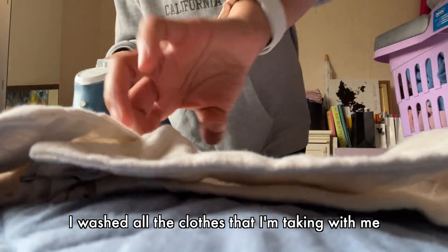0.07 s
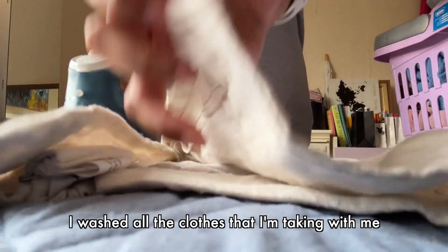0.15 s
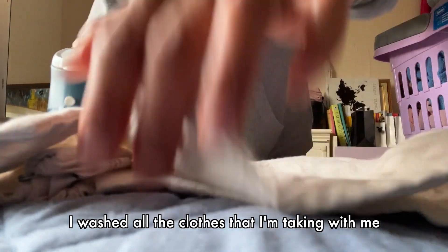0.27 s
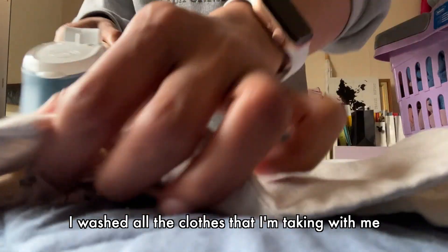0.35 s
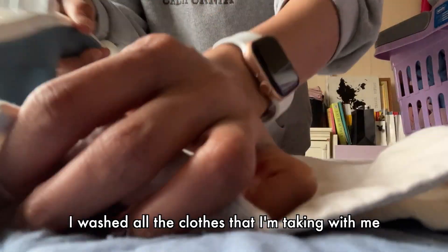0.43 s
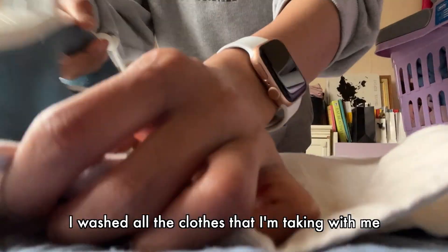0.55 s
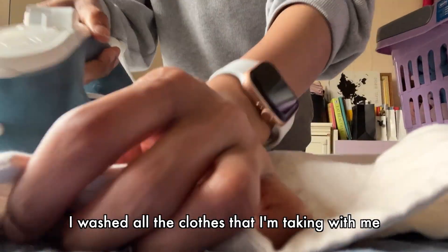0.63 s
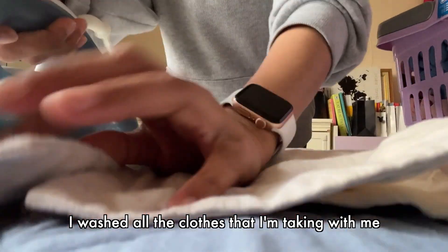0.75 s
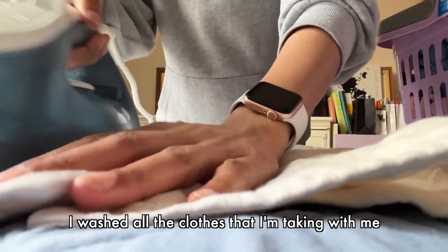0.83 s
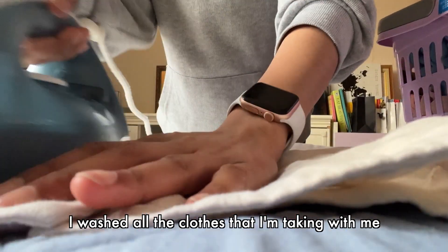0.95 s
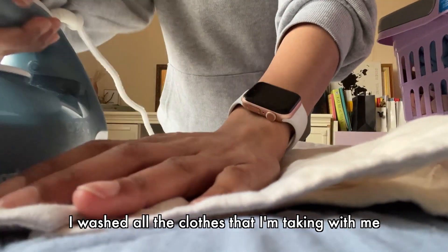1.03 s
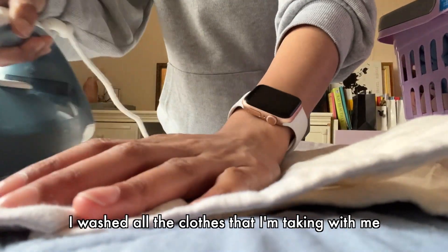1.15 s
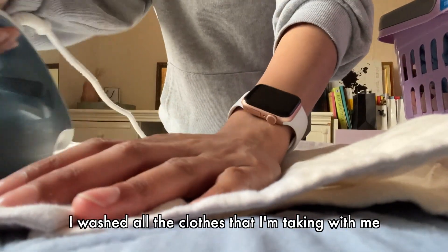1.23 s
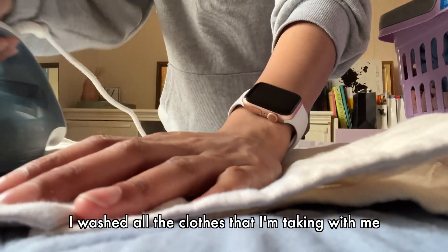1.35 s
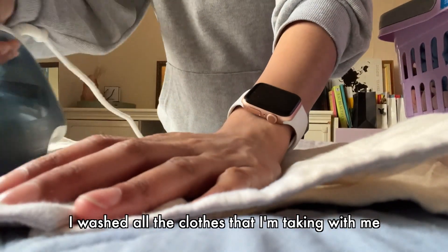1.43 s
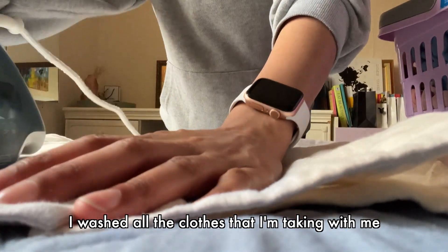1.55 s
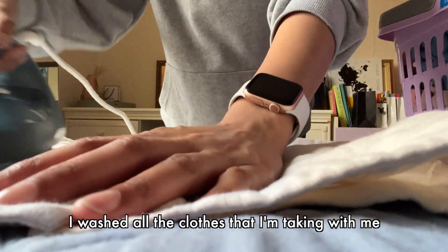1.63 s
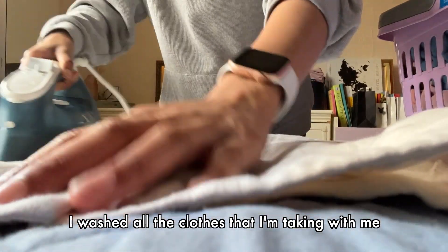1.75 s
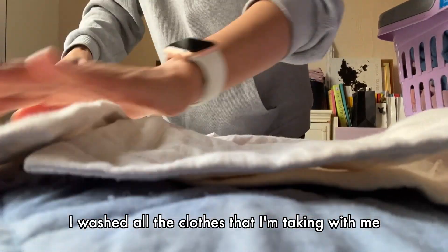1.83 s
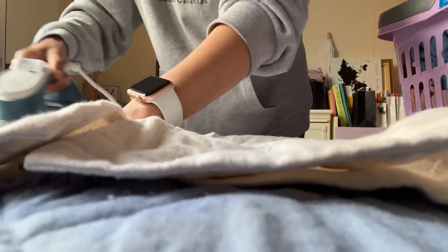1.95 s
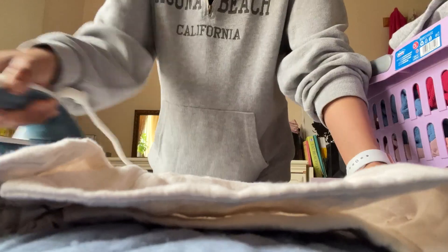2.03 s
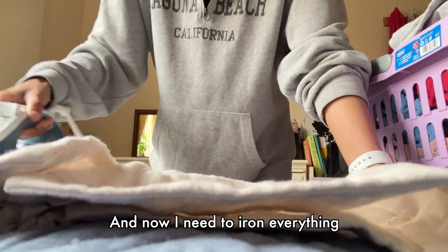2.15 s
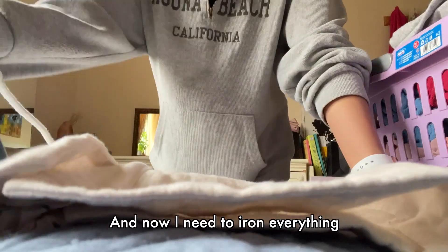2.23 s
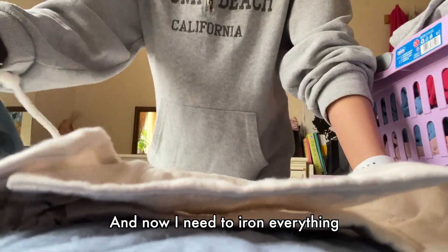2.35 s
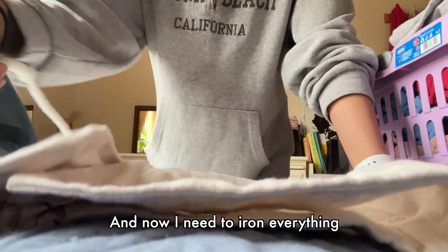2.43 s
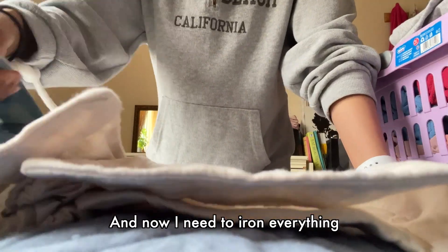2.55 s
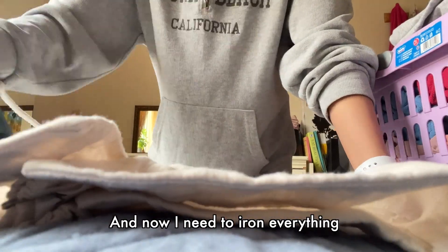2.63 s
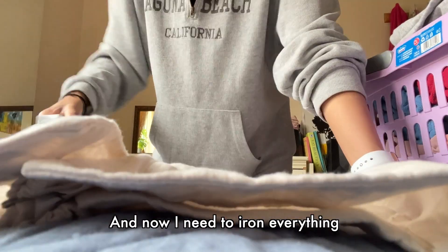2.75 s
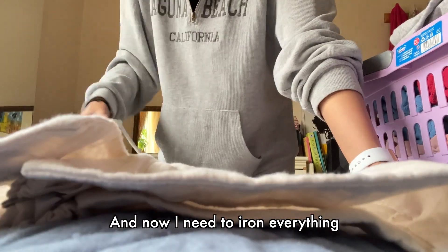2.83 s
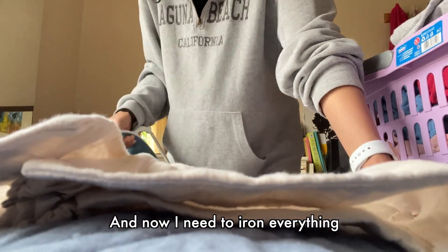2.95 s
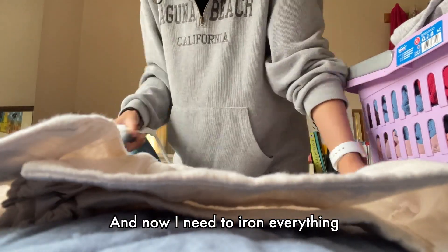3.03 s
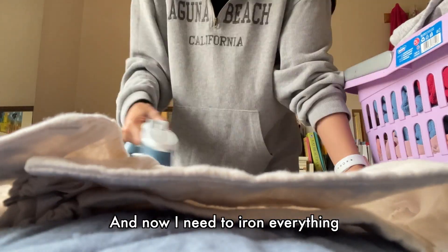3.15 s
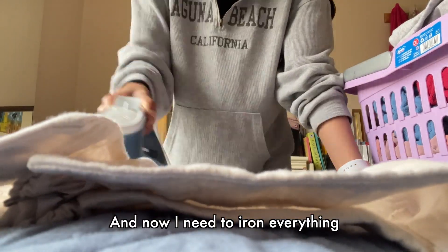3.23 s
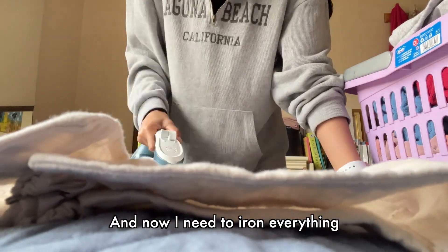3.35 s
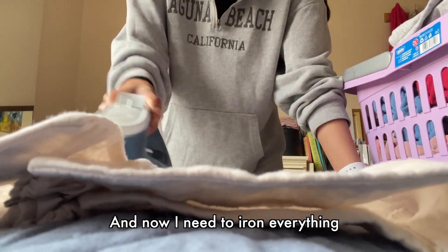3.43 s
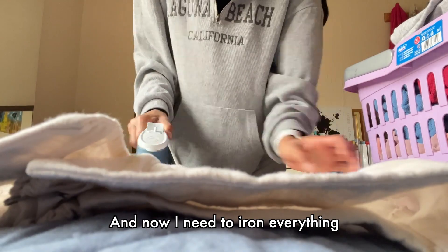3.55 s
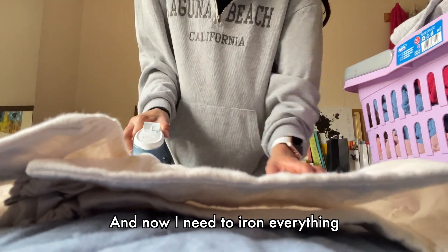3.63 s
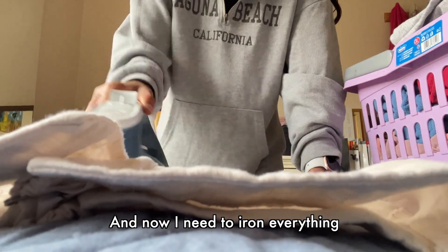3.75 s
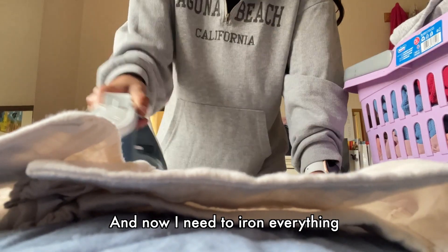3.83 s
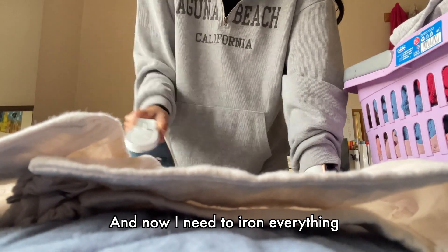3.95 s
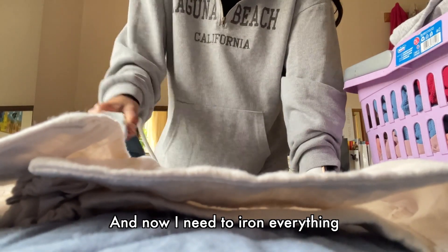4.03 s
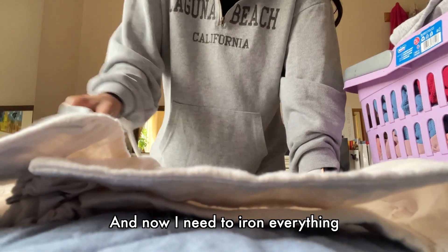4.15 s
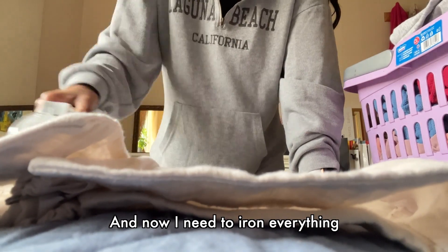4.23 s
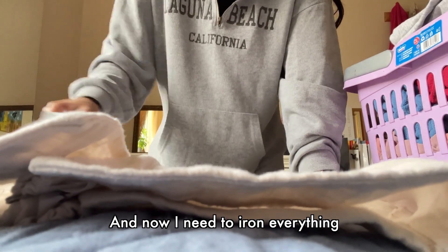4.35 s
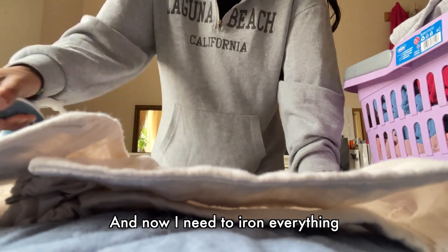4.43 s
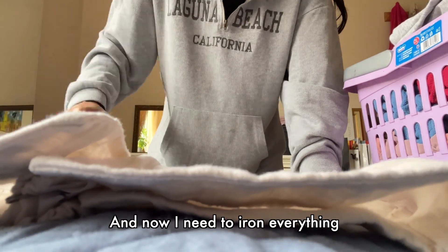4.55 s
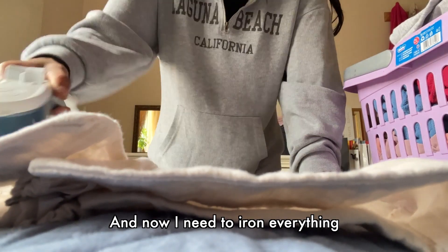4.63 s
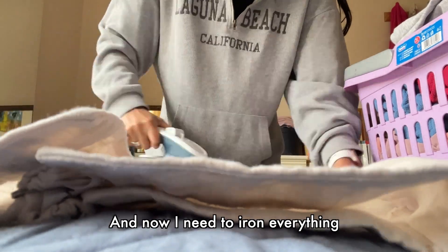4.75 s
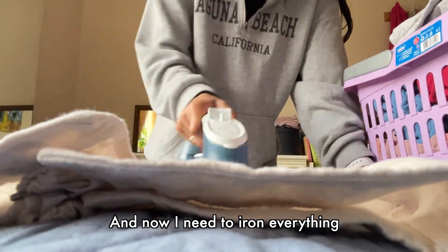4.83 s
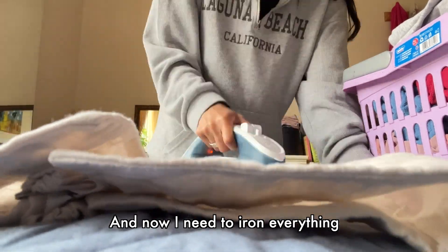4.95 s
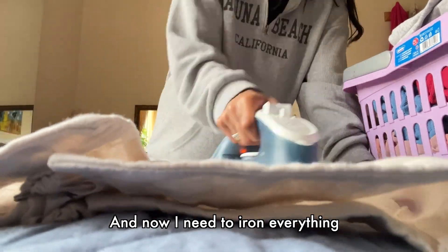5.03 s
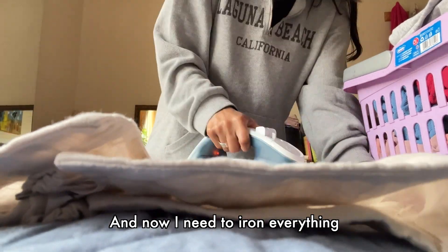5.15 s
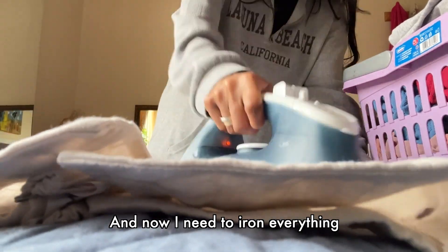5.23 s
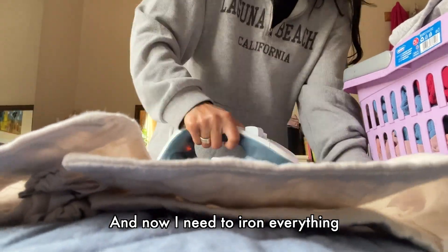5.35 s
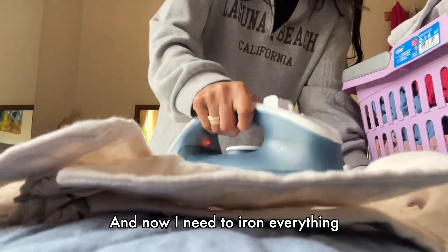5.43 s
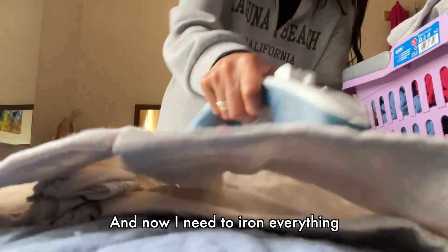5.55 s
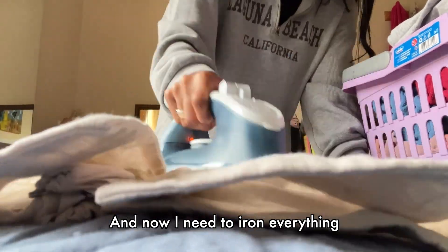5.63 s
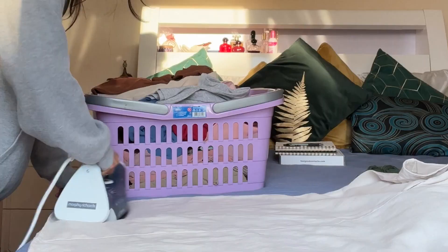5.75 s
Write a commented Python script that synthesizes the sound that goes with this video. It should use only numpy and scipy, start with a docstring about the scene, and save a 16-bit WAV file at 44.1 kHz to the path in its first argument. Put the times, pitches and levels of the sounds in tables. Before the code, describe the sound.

Close, sped-up ironing on a bed: plastic knocks, a big padded thump, rustling fabric, then short soft swishes with a few small bumps and ticks.

```python
"""On a bed, clothes are ironed, sounding sped up as in a time-lapse, close to a stereo microphone.
Hands slide over the cloth, which rubs and hisses: shaped noise with many tiny slips in it.
The soleplate swishes to and fro, with bands of noise that follow its speed. Hand and iron land with thumps,
damped low swings, two of them heavy. Folds crunch and creases snap as short bursts of noise.
The iron's body knocks, its plastic shell clatters and small hard parts clink, all as brief resonances."""
import sys
import numpy as np
from scipy import signal
from scipy.fft import rfft, irfft, next_fast_len
from scipy.io import wavfile

SR = 44100
rng = np.random.default_rng(int(sys.argv[2]) if len(sys.argv) > 2 else 0)


def master(y):
    """Save y as 16-bit WAV."""
    cut = np.clip(np.atleast_2d(y).T, -1, 1)
    pcm = np.round(cut * 32767)  # scale
    wavfile.write(sys.argv[1], SR, pcm.astype(np.int16))


N = 255118
TIME = np.arange(N) / SR
SIZE = next_fast_len(N, True)   # padded length for the Fourier transforms
BIN_HZ = np.maximum(np.arange(SIZE // 2 + 1) * SR / SIZE, 1)


# tone colour of rubbing cloth: (f/Hz, relative level/dB)
RUB_COLOUR = [(170, -10.5), (270, 0.5), (360, -6), (480, -6), (700, -14), (1000, -17.5), (1500, -26.5),
              (2500, -30.5)]
# tone colour of hissing fibres: (f/Hz, relative level/dB)
HISS_COLOUR = [(900, -5.5), (1900, 3), (2700, -0.5), (3400, 1.5), (4150, 5.5), (5200, 0.5), (6500, 1),
               (8500, 2), (10500, -21.5), (12500, -14.5), (14000, -5), (15500, -27)]
DRAG_FOLLOWS = 0.63   # share of a stroke's swing in level that the dragged cloth follows


def cloth(stir_rub_db=-10, stir_hiss_db=-19, drag_rub_db=-24, drag_hiss_db=-28):
    """Cloth slid by hand, dragged by the iron or just stirring rubs in the middle range and hisses on top."""
    stir = stirring()
    drag = stroke_force() ** DRAG_FOLLOWS
    slide_rub, slide_hiss = slides()
    sliding, shaking = stills()
    rub = sliding * together(slide_rub, from_db(stir_rub_db) * stir * shaking, from_db(drag_rub_db) * drag)
    hiss = sliding * together(slide_hiss, from_db(stir_hiss_db) * stir, from_db(drag_hiss_db) * drag)
    out = bedding_rumble(stir, shaking, slide_rub, hiss)
    out += rub * friction(RUB_COLOUR, slips_per_s=220, slip_db=-5, catch_db=2.0, catch_rate=48)
    out += hiss * friction(HISS_COLOUR, slips_per_s=1400, slip_db=-10.5, catch_db=1.2, catch_rate=35)
    return out


# a hand or a sleeve slides over the cloth: (t/s at full speed, length/s, rubbing level/dB, hiss level/dB)
SLIDES = [(0.119, 0.085, -32.5, -45.5), (0.175, 0.044, -43, -38), (0.288, 0.031, -45, -46.5),
          (0.326, 0.064, -58, -43), (0.396, 0.032, -35.5, -44.5), (0.462, 0.077, -29.5, -40),
          (0.552, 0.056, -33, -34), (0.625, 0.11, -29, -38), (0.692, 0.057, -34, -35),
          (0.796, 0.13, -40.5, -42.5), (0.93, 0.065, -39.5, -38.5), (1.067, 0.067, -35.5, -47),
          (1.138, 0.045, -36.5, -54), (1.203, 0.06, -39.5, -38.5), (1.332, 0.097, -41.5, -46.5),
          (1.476, 0.083, -44.5, -41.5), (1.591, .13, -39, -48), (1.793, 0.13, -45, -48.5),
          (1.916, 0.14, -41.5, -55), (2.041, 0.13, -43.5, -46.5), (2.191, 0.049, -38, -50.5),
          (2.243, 0.044, -35, -40), (2.321, 0.042, -34.5, -44), (2.374, 0.047, -40, -45),
          (2.46, 0.091, -43.5, -42.5), (2.579, 0.056, -49, -43), (2.693, 0.089, -36, -48),
          (2.844, 0.041, -40.5, -52), (2.935, 0.079, -41, -50.5), (3.08, 0.28, -45.5, -56),
          (3.248, 0.15, -47.5, -51), (3.417, 0.11, -46, -47.5), (3.823, 0.22, -44.5, -51),
          (3.992, 0.13, -68, -53), (4.198, 0.079, -58, -49.5), (4.421, 0.082, -40.5, -51),
          (4.585, 0.14, -42.5, -72), (4.678, 0.2, -39, -47), (4.873, 0.099, -40, -46),
          (5.09, 0.12, -61, -50.5), (5.258, 0.12, -42, -47), (5.412, 0.064, -33.5, -47.5),
          (5.506, 0.085, -37, -43.5), (5.587, 0.022, -45, -47), (5.732, 0.2, -43, -44)]
SLIDE_FLATNESS, SLIDE_END_DB = 1.69, -6   # how long a slide holds its speed; its change at either end
WEIGHT_LEAD_S = 0.0017   # the weight peaks this much before the speed


def slides():
    """A slide gathers speed, holds it and eases off, its weight a little early: the gains of rubbing and hiss."""
    power = np.zeros((2, N))
    for s, length, rub_db, hiss_db in SLIDES:
        near = np.abs(TIME - s) < length
        from_middle = np.abs(TIME[near] - s + np.array([[WEIGHT_LEAD_S], [0]])) / (length / 2)
        level_db = np.array([[rub_db], [hiss_db]]) + SLIDE_END_DB * from_middle ** SLIDE_FLATNESS
        power[:, near] += from_db(level_db) ** 2
    return np.sqrt(power)


# the movement stops or turns round: (t/s, length/s, change of friction level/dB, change of rumble level/dB)
STILLS = [(0.02, 0.05, -7.5, 0.5), (0.312, 0.025, -5.5, -6.5), (0.869, 0.014, -9, -1),
          (1.002, 0.085, 0.5, -14.5), (1.283, 0.069, -1, -9), (1.405, 0.044, -6.5, 1.5),
          (1.529, 0.042, -2.5, -6.5), (1.747, 0.082, 0.5, -6.5), (1.839, 0.073, -12, 5),
          (2.97, 0.023, -13, 6), (3.097, 0.029, -6.5, 7), (3.29, .03, -2, 5), (3.391, 0.027, -3.5, 3),
          (3.49, .025, -2.5, 3.5), (3.625, 0.071, -4.5, -9), (3.698, 0.025, -8, -7),
          (3.942, 0.022, -0.5, -21), (4.033, 0.01, -5, 1), (4.118, 0.015, -8, -5),
          (4.225, 0.023, -4.5, 5.5), (4.332, 0.018, -7, 3), (4.446, .02, -4.5, -1),
          (4.538, 0.075, -1.5, -5), (5.002, 0.021, -3.5, 9.5)]


def stills():
    """Friction mostly dies down where the movement stops or turns round: the gains of friction and rumble."""
    change_db = np.zeros((2, N))
    for s, length, friction_db, rumble_db in STILLS:
        near = np.abs(TIME - s) < length
        dip = np.exp(-np.abs(2 * (TIME[near] - s) / length) ** 3)
        change_db[:, near] += np.array([[friction_db], [rumble_db]]) * dip
    return from_db(change_db)


def folds(x, depth_db=7.5, rate=18, count=8):
    """Shifting folds favour now one pitch, now another."""
    out = x
    for hz in np.geomspace(450, 6000, count):
        favour = from_db(depth_db * np.tanh(drift(rate)))
        out = out + resonate(x, hz, hz / 4) * (favour - 1)
    return out


# tone colour of the swish: (f/Hz, relative level/dB)
SWISH_COLOUR = [(200, -34), (380, 2), (800, -3), (1400, -6.5), (2000, -9), (3000, -19.5), (5000, -58),
                (9000, -69)]
# tone colour of the grit in firm strokes: (f/Hz, relative level/dB)
GRIT_COLOUR = [(1500, -32), (2400, 24), (3600, 18.5), (6000, -47), (10000, -42)]
# soleplate strokes: (t/s at the height, level/dB, swell/s, fade/s, weave pitch at full speed f/Hz)
STROKES = [(1.655, -45, 0.061, 0.1, 1170), (2.029, -50, 0.11, 0.062, 1403),
           (2.125, -37, 0.024, 0.029, 1400), (2.245, -66, 0.018, 0.025, 1300),
           (2.729, -43.5, 0.019, 0.02, 1100), (2.762, -38, 0.013, 0.013, 920),
           (3.235, -49.5, 0.023, 0.04, 1300), (3.334, -41.5, 0.031, 0.029, 1340),
           (3.44, -46.5, 0.039, 0.028, 1405), (3.552, -41.5, 0.051, .028, 1196),
           (3.794, -50.5, 0.035, .025, 1426), (3.874, -38, 0.028, 0.032, 1463),
           (3.999, -46, 0.044, 0.028, 1554), (4.067, -38, 0.021, .026, 1480),
           (4.179, -42, 0.046, .036, 1495), (4.283, -39, 0.039, .022, 1570),
           (4.385, -42, 0.037, .042, 1324), (4.498, -40, 0.031, 0.024, 1338),
           (4.712, -42, 0.05, 0.06, 1298), (4.878, -41.5, 0.074, 0.035, 1233),
           (4.959, -34, .024, .02, 1260), (5.068, -48, 0.058, .03, 926), (5.129, -39.5, 0.02, .02, 1545),
           (5.153, -33, .013, 0.018, 1150), (5.316, -36.5, 0.022, .025, 1384),
           (5.338, -28.5, .009, 0.016, 1070), (5.411, -49.5, 0.03, 0.038, 998),
           (5.51, -50, 0.023, 0.017, 1000), (5.61, -33, 0.009, 0.02, 905),
           (5.664, -44.5, 0.013, 0.024, 1000)]
# thread spacings that sing under the plate: (multiple of the weave pitch, width f/Hz, level/dB)
WEAVE = [(.7, 230, -10.5), (1, 152, -5), (1.32, 260, -9)]
STROKE_ROUNDNESS = 1.75   # how evenly a stroke eases off: 1 is a sudden drop with a tail, 2 a round shoulder
SLOW_PITCH = .48   # share of the weave pitch left when the plate is slow
SPEED_SPAN, SPEED_LAG = .7, .15   # width and delay of the speed's arch, in stroke lengths (swell + fade)


def soleplate(swish_db=0.0, grit_db=-6, firm_db=-33, bed_db=-4, dent_db=0, dent_hz=240, dent_width_hz=150):
    """The plate swishes over the weave, its pitch following the speed; firm strokes add grit, rub and drone."""
    force = stroke_force()
    bite = np.tanh(force / from_db(firm_db)) ** 2   # near 1 for firm strokes, near 0 for light ones
    swish = friction(SWISH_COLOUR, slips_per_s=1200, slip_db=-8, catch_db=1.6, catch_rate=90)
    grit = friction(GRIT_COLOUR, slips_per_s=2500, slip_db=-6, catch_db=1, catch_rate=120)
    bed_rub = friction(RUB_COLOUR, slips_per_s=250, slip_db=-8, catch_db=1, catch_rate=36)
    bed_drone = ringing_band(np.full(N, dent_hz), dent_width_hz)
    out = from_db(swish_db) * force * swish
    out += from_db(grit_db) * force * bite * grit
    out += from_db(bed_db) * force * bite * bed_rub
    out += from_db(dent_db) * force * np.sqrt(bite) * bed_drone
    for s, level_db, swell, fade, top_hz in STROKES:
        near, gain = contact(s, level_db, swell, fade, STROKE_ROUNDNESS)
        speed = np.exp(-(((TIME[near] - s) / (swell + fade) - SPEED_LAG) / SPEED_SPAN) ** 2)
        hz = top_hz * (SLOW_PITCH + (1 - SLOW_PITCH) * speed)
        for multiple, width, thread_db in WEAVE:
            out[:, near] += from_db(thread_db) * gain * ringing_band(multiple * hz, width)
    return out * stills()[0]


def stroke_force():
    """The joint gain of all soleplate strokes."""
    return gestures([(*row[:4], STROKE_ROUNDNESS) for row in STROKES])


# soft blows on the mattress: (t/s at the height, level/dB at the height, pitch f/Hz at the height, length/s)
THUMPS = [(.095, -17, 213, 0.0061), (.126, -20, 167, .012), (.205, -25.5, 116, 0.008),
          (.218, -25.5, 202, .014), (.287, -15.5, 66.5, 0.017), (.431, -12.5, 83, .013),
          (.523, -7, 457, 0.00364), (.529, -11, 200, 0.0064), (.536, -2.5, 249, 0.0066),
          (.549, -12.5, 240, 0.015), (.564, -14.5, 392, 0.0085), (.571, -21, 130, 0.0083),
          (.594, -25, 467, 0.0056), (.603, -17.5, 273.6, 0.028), (.619, -2, 125.3, 0.021),
          (.622, -9.5, 260, 0.016), (.65, -12.5, 146.4, .02), (.68, -25, 351, 0.0081),
          (.714, -18.5, 95, 0.015), (.783, -20.5, 90, .012), (.847, -15.5, 273, 0.003),
          (.855, -22.5, 160, 0.0067), (.905, -17, 84.3, 0.016), (1.09, -32, 282, 0.024),
          (1.193, -24, 89, 0.019), (1.21, -26, 300, .005), (1.348, -26.5, 290, 0.011),
          (1.477, -19.5, 66, 0.015), (1.601, -17.5, 193, 0.0066), (1.65, -23.5, 316, 0.0051),
          (1.812, -25.5, 178, 0.0069), (1.843, -26, 189, 0.019), (1.862, -27, 83, 0.019),
          (2.07, -24, 93, 0.007), (2.247, -15, 114, 0.009), (2.256, -24, 316, 0.0037),
          (2.323, -19.5, 161, 0.0092), (2.356, -18.5, 90, 0.012), (2.44, -31, 109.7, 0.028),
          (2.768, -14.5, 478, 0.0043), (2.779, -19, 133.7, 0.032), (2.803, -18, 259, 0.013),
          (3.175, -28, 378, .008), (3.193, -21, 132, 0.01), (3.354, -27, 135.7, 0.051),
          (3.835, -24, 94, 0.0092), (3.89, -31.5, 204, .028), (4.085, -32, 222, 0.011),
          (4.248, -29, 223, 0.0069), (5.51, -23, 414, 0.01), (5.522, -19, 219, 0.006),
          (5.713, -17, 109.5, 0.015)]
# each stroke opens with a push on the mattress, so many swells before its height
PUSH_LEAD, PUSH_DB, PUSH_HZ, PUSH_S = 1.38, -32, 76, 0.006


def thumps(sag=0.29, apart_db=-9, shudder_width=0.88):
    """A blow or push gives the mattress a few damped swings that sink in pitch, and the bedding shudders."""
    pushes = [(s - PUSH_LEAD * swell, PUSH_DB, PUSH_HZ, PUSH_S) for s, _, swell, _, _ in STROKES]
    out = np.zeros((2, N))
    for s, peak_db, hz, length in list(THUMPS) + pushes:
        near = np.abs(TIME - s) < 3 * length
        age = (TIME[near] - s) / length
        sharpness = np.where(age < 0, 3.0, 2.2)   # it rises faster than it fades
        swing = from_db(peak_db) * np.exp(-sharpness * age ** 2)
        angle = 2 * np.pi * hz * length * (age - sag * age ** 2 / 2)
        shudder = ringing_band(np.full(len(age), hz), shudder_width * hz)[0]
        out[:, near] += swing * np.array([np.sin(angle), from_db(apart_db) * shudder])
    return out


# the iron's body knocks as it lands: (t/s, level/dB, fade/s)
KNOCKS = [(.447, -43, 0.017), (0.537, -17.5, 0.0075), (.546, -21, .005), (0.559, -24, 0.0066),
          (.571, -32, .003), (0.599, -38, 0.0069), (0.611, -38, 0.0083), (2.775, -25.5, 0.0033),
          (2.791, -28.5, 0.0087), (5.194, -38.5, 0.0032)]
# resonances of the iron's body: (f/Hz, width f/Hz, level/dB)
BODY = [(1430, 130, -3), (1660, 130, -3), (1910, 230, -4.5), (2240, 160, 0.5), (2600, 280, -3),
        (3320, 240, -2.5)]


def knocks(rise_s=0.0015):
    """The iron lands with rough knocks that ring briefly in its body."""
    rows = [(s, level_db, rise_s, fade) for s, level_db, fade in KNOCKS]
    blows = gestures(rows) * rng.standard_normal((2, N))
    out = np.zeros((2, N))
    for k, (hz, width, level_db) in enumerate(BODY):
        # a narrow resonance lets less noise through, so it is raised
        evened = np.sqrt(SR / (np.pi * width * len(BODY)))
        out += from_db(level_db) * evened * resonate(blows, hz, width) * (-1) ** k
    return out


# tone colour of chattering plastic: (f/Hz, relative level/dB)
CLATTER_COLOUR = [(900, -21), (1300, -1), (1700, -3.5), (2400, -4), (3000, -1), (4200, -2), (6000, 1.5),
                  (8700, -1), (11000, -14), (14500, -20)]
# the iron's shell clatters: (t/s, level/dB, swell/s, fade/s)
CLATTERS = [(.1538, -21, .0008, .008), (.1607, -20, .0008, .011), (.169, -26, .003, .016),
            (.19, -33, .008, .026), (3.654, -34, .003, .007), (3.664, -33.5, .003, .011),
            (5.696, -36, .004, .011), (5.724, -39, .006, .015)]
# rings of the shell: (f/Hz, width f/Hz, level/dB)
SHELL_RINGS = [(1490, 130, -1), (1700, 60, 0.5), (1980, 150, 0), (2270, 92, 3.5), (2450, 130, 4),
               (2940, 150, 2), (3320, 210, -5), (3950, 90, 8.5), (4200, 97, 3), (4740, 170, -2),
               (6440, 200, -7), (8760, 270, -5)]


def shell(chatter_db=-1, ring_db=4):
    """Loose plastic parts chatter against the hollow shell of the iron and make it ring."""
    contacts = friction(CLATTER_COLOUR, slips_per_s=4500, slip_db=-7, catch_db=.6, catch_rate=300)
    chatter = gestures(CLATTERS) * contacts
    ringing = sum(from_db(level_db) * resonate(chatter, hz, width) for hz, width, level_db in SHELL_RINGS)
    return from_db(chatter_db) * chatter + from_db(ring_db) * ringing


# hard knocks on the shell: (t/s, level/dB, brightness of the contact f/Hz)
SHELL_HITS = [(0.1533, -15, 2400), (.1603, -26, 5000), (0.1675, -18.5, 3500)]


def shell_hits():
    """A hard knock sets all rings of the shell going at once; a duller contact favours the low ones."""
    out = np.zeros((2, N))
    for s, hit_db, bright_hz in SHELL_HITS:
        near = (TIME > s) & (TIME < s + .1)
        age = TIME[near] - s
        for hz, width, level_db in SHELL_RINGS:
            decay = np.exp(-np.pi * width * age)
            dullness = np.sqrt(1 + (hz / bright_hz) ** 4)
            gain = from_db(hit_db + level_db) * decay / dullness
            out[:, near] += gain * np.sin(2 * np.pi * (hz * age + rng.random((2, 1))))
    return out


# small hard parts set ringing: (t/s, pitch f/Hz, width f/Hz, level/dB, fade/s)
CLINKS = [(.094, 802, 450, -29.5, 0.016), (.094, 3480, 25, -36, 0.016), (0.093, 4600, 150, -36, 0.019),
          (0.093, 5330, 90, -38, .024), (.093, 6520, 200, -33, .014), (.378, 541, 160, -31, .025),
          (0.445, 899, 60, -23, 0.013), (.522, 620, 220, -29, .009), (.541, 1252, 600, -28, 0.013),
          (.599, 1050, 600, -26.5, .013), (.445, 1920, 220, -42, 0.013), (0.538, 4180, 150, -23, 0.016),
          (0.544, 4390, 130, -20, 0.019), (0.542, 7390, 130, -27, 0.016), (0.542, 7900, 320, -30, 0.016),
          (.542, 8750, 200, -35, .012), (2.757, 700, 300, -32, .008), (2.768, 756, 300, -30, 0.015),
          (2.776, 6800, 220, -30, 0.013), (2.936, 4220, 700, -39.5, 0.019),
          (2.935, 5670, 800, -27.5, 0.014), (2.937, 7200, 1110, -33.5, 0.016),
          (3.162, 1188, 700, -34, .012), (3.726, 1029, 250, -33, 0.0079), (3.726, 2406, 300, -37.5, 0.008),
          (5.697, 5710, 160, -38, 0.0072), (5.698, 4040, 500, -42, 0.014),
          (5.697, 8230, 450, -24.5, 0.0085), (5.696, 12900, 2400, -33, 0.019)]


def clinks(rise_s=0.0042, blur_hz=110, damping=1.31):
    """A jostled hard part rings: a sharp resonance is clean, a broad one rasps, and the hand soon damps both."""
    out = np.zeros((2, N))
    for s, hz, width, level_db, fade in CLINKS:
        near, gain = contact(s, level_db, rise_s, fade, damping)
        pure = 1 / (1 + (width / blur_hz) ** 2)   # share of clean tone in the power
        angle = 2 * np.pi * (hz * TIME[near] + rng.random())
        tone = np.sqrt(2) * np.array([np.cos(angle), np.sin(angle)])
        rasp = ringing_band(np.full(len(near), hz), width)
        out[:, near] += gain * (np.sqrt(pure) * tone + np.sqrt(1 - pure) * rasp)
    return out


# tone colour of crushed cloth: (f/Hz, relative level/dB)
CRUNCH_COLOUR = [(300, -2.5), (700, -0.5), (1100, -7), (2500, -13.5), (4500, -10), (7000, -7.5),
                 (10000, -20), (14500, -33)]
# cloth crushed under a hand or the iron: (t/s, level/dB, swell/s, fade/s)
PRESSES = [(.0845, -29.5, 0.0008, 0.0061), (.095, -32, 0.0083, 0.022), (.378, -44, 0.019, 0.0077),
           (.412, -43, .006, .012), (.441, -32.5, 0.001, 0.04), (.523, -35, 0.0013, 0.014),
           (.541, -25, 0.0056, 0.013), (.563, -31, 0.0028, 0.0069), (.597, -23, 0.00082, 0.019),
           (.683, -40, .014, 0.012), (1.423, -45, .0008, 0.012), (1.647, -49, 0.0053, 0.015),
           (2.292, -41, 0.001, 0.014), (2.534, -36.5, 0.001, 0.0073), (2.779, -26.5, 0.0057, 0.013),
           (3.16, -42, 0.0009, 0.02), (3.658, -45, 0.0048, 0.015), (3.725, -40.5, 0.00087, 0.0094),
           (4.056, -44.5, 0.00085, 0.018), (5.333, -48, .001, .012), (5.605, -53, .001, .012),
           (5.708, -38, 0.01, 0.015)]
# hollow ring of the bed: (f/Hz, width f/Hz, relative level/dB)
BED_RINGS = [(309, 96, 3.5), (384, 71, -5), (440, 160, -10.5)]


def presses(bed_db=9):
    """Folds crunch as they are pressed flat, and the bed answers with a hollow ring."""
    grain = friction(CRUNCH_COLOUR, slips_per_s=900, slip_db=-1, catch_db=2.2, catch_rate=220)
    crunch = gestures(PRESSES) * grain
    return crunch + sum(from_db(bed_db + level_db) * resonate(crunch, hz, width)
                        for hz, width, level_db in BED_RINGS)


# tiny snaps of fibres and creases, and one loud bright tick near the end: (t/s, level/dB before the band
# filter)
SNAPS = [(1.989, -27), (2.087, -28), (2.385, -29.5), (2.832, -35.5), (3.158, -37), (3.656, -24),
         (4.765, -30.5), (5.269, -32), (5.293, -27.5), (5.694, -17)]


def snaps(fade_s=0.0013, low_hz=3200):
    """Single creases snap with a very short, bright tick of noise; near the end one loud tick stands out."""
    rows = [(s, level_db, fade_s / 2, fade_s) for s, level_db in SNAPS]
    ticks = gestures(rows) * rng.standard_normal((2, N))
    return signal.sosfilt(signal.butter(2, [low_hz, 14000], "band", fs=SR, output="sos"), ticks)


# how strongly the bedding stirs, before each sound's own gain: (t/s, level/dB)
STIR_LEVEL = [(0.0, -33), (0.13, -42), (0.56, -27.5), (0.74, -38.5), (0.9, -33.5), (1.38, -36),
              (1.66, -37.5), (2.14, -42.5), (2.46, -37.5), (3.03, -42), (3.41, -38), (3.56, -35.5),
              (3.7, -49.5), (4.23, -39), (4.62, -43.5), (4.83, -38), (5.33, -40), (5.78, -33)]


def stirring():
    """The slowly changing gain of the bedding's stirring."""
    return from_db(np.interp(TIME, *np.transpose(STIR_LEVEL)))


# tone colour of the rumbling bedding: (f/Hz, relative level/dB)
RUMBLE_COLOUR = [(22, -26), (40, -2.5), (65, 0), (130, 0.5), (165, -4), (200, -5), (270, -11.5), (400, -17)]


def bedding_rumble(stir, shaking, slide_rub, hiss, bedding_db=4, rest_db=-7, moving_db=-50, weight_db=-5):
    """The bedding rumbles low as it stirs, more while the cloth hisses and under the weight of a slide."""
    moving = together(np.tanh(hiss / from_db(moving_db)), from_db(rest_db))
    rumble = shaking * together(from_db(bedding_db) * stir * moving, from_db(weight_db) * slide_rub)
    return rumble * friction(RUMBLE_COLOUR, slips_per_s=80, slip_db=-6, catch_db=1.8, catch_rate=18.7)


def friction(spectrum, slips_per_s, slip_db, catch_db, catch_rate):
    """Countless tiny slips and some larger ones, catching and letting go; two unrelated rows of power 1."""
    sizes = np.minimum(rng.exponential(1, (2, N)), 4) * rng.choice([-1, 1], (2, N))
    slips = rms_one(sizes * (rng.random(N) < slips_per_s / SR))
    catching = from_db(catch_db * drift(catch_rate))
    force = (rng.standard_normal((2, N)) + from_db(slip_db) * slips) * catching
    # beyond the first and last row of the table the colour falls off steeply
    skirts = np.minimum(BIN_HZ / spectrum[0][0], 1) ** 2 * np.minimum(spectrum[-1][0] / BIN_HZ, 1) ** 2
    colour = from_db(at_hz(spectrum, BIN_HZ)[0]) * skirts
    return rms_one(irfft(rfft(force, SIZE) * colour, SIZE)[:, :N])


def ringing_band(hz, width):
    """Restless ringing about a pitch that may move; two unrelated rows of power 1."""
    width = np.clip(width, 10, 3000)
    settle = 4000   # samples dropped while the filter starts up
    lowpass = signal.butter(2, width / 2, fs=SR, output="sos")
    wobble = signal.sosfilt(lowpass, rng.standard_normal((2, 2, len(hz) + settle)))[..., settle:]
    angle = 2 * np.pi * np.cumsum(hz) / SR
    return rms_one(wobble[0] * np.cos(angle) + wobble[1] * np.sin(angle))


def resonate(x, hz, width):
    """A resonance with gain 1 at its top."""
    r = np.exp(-np.pi * width / SR)
    feedback = [1, -2 * r * np.cos(2 * np.pi * hz / SR), r * r]
    return signal.lfilter(np.array([1, 0, -1]) * (1 - r * r) / 2, feedback, x)


def contact(s, level_db, swell, fade, roundness=1.0):
    """A contact swells smoothly to its height, then dies away: its samples and its gain there."""
    near = np.flatnonzero((TIME > s - 4 * swell) & (TIME < s + 7 * fade))
    age = TIME[near] - s
    before = (np.minimum(age, 0) / swell) ** 2
    after = (np.maximum(age, 0) / fade) ** roundness
    return near, from_db(level_db) * np.exp(-before - after)


def gestures(rows):
    """The joint gain of several contacts; their powers add."""
    power = np.zeros(N)
    for row in rows:
        near, gain = contact(*row)
        power[near] += gain ** 2
    return np.sqrt(power)


def together(*gains):
    """The joint gain of unrelated causes; their powers add."""
    return np.sqrt(sum(gain ** 2 for gain in gains))


def drift(rate):
    """Smooth chance of spread 1 that changes about rate times a second."""
    smooth = np.exp(-np.minimum(BIN_HZ / rate, 10) ** 2)
    return rms_one(irfft(rfft(rng.standard_normal(SIZE)) * smooth, SIZE)[:N])


def at_hz(rows, hz):
    """Every column of a table, read on a log-frequency axis."""
    points, *columns = np.transpose(rows)
    return [np.interp(np.log(hz), np.log(points), c) for c in columns]


def from_db(db):
    """Decibels to gain."""
    return 10 ** (np.asarray(db) / 20)


def rms_one(x):
    """Scale to unit power."""
    return x / np.sqrt(np.mean(x ** 2) + 1e-20)


# stereo image by pitch: (f/Hz, likeness of left and right 0-1, left leads by/rad, left over right level/dB)
STEREO_IMAGE = [(40, .7, 0, 0), (150, .55, 0, .5), (300, .45, .3, -.5), (550, .3, 1.7, -1.2),
                (1200, .3, .4, -1.2), (2200, .25, 2.0, -1.2), (3300, .1, 1.5, -2), (4700, .2, 2.4, -4),
                (6000, .3, 1.7, -3), (7500, .65, 1.9, 2.6), (8700, .7, 2.2, 1), (9900, .97, 3.05, 0),
                (12000, .98, 3.14, 0), (16000, .55, 2.2, 0)]


def stereo_image(x):
    """Row 0 goes to both sides alike, row 1 with opposite signs; stereo likeness and lead are set by pitch."""
    likeness, lead, left_db = at_hz(STEREO_IMAGE, BIN_HZ)
    likeness, sides = np.clip(likeness, 0, 1), np.array([[1], [-1]])
    shared, apart = rfft(x, SIZE)
    pair = np.sqrt((1 + likeness) / 2) * shared + sides * np.sqrt((1 - likeness) / 2) * apart
    return irfft(pair * from_db(sides * left_db / 2) * np.exp(1j * sides * lead / 2), SIZE)[:, :N]


# where the work is going on: (t/s, left over right level/dB, for the sound below the treble)
POSITION = [(0, -1), (.7, 1.7), (1.3, 3), (1.8, 1), (2.25, 2.5), (2.8, 1), (3.7, 1), (4.3, 2), (5.2, -2),
            (5.75, -1.5)]


def scene():
    """All sources are heard without echo; the side nearer to the work gets more of the body of the sound."""
    handling = presses() + thumps() + knocks() + shell() + shell_hits() + clinks() + snaps()
    pair = stereo_image(folds(cloth()) + soleplate() + handling)
    body = signal.sosfiltfilt(signal.butter(2, 4000, fs=SR, output="sos"), pair)
    left_db = np.interp(TIME, *np.transpose(POSITION))
    return pair + body * (from_db(np.array([left_db, -left_db]) / 2) - 1)


CUTOFF_HZ = 15900


def record(dry):
    """The highest peaks are rounded and the top is cut."""
    rounded = dry / (1 + (dry / .95) ** 8) ** (1 / 8)
    return signal.sosfilt(signal.ellip(10, .1, 80, CUTOFF_HZ, fs=SR, output="sos"), rounded)


dry = scene()
out = record(dry)
master(out)
```